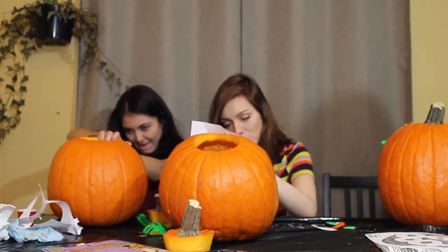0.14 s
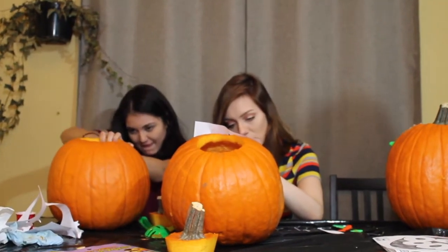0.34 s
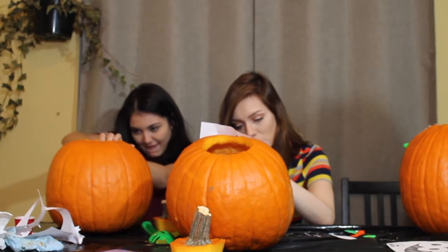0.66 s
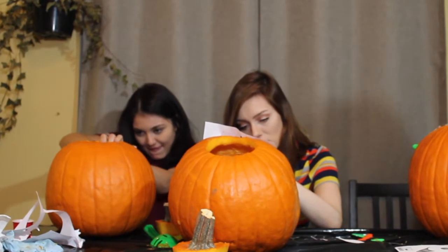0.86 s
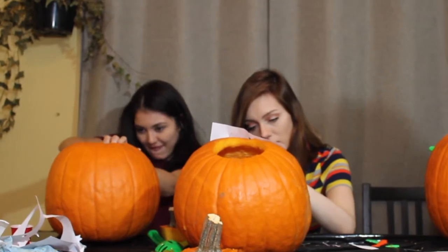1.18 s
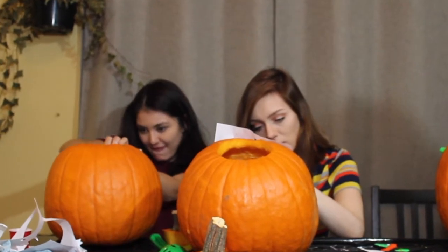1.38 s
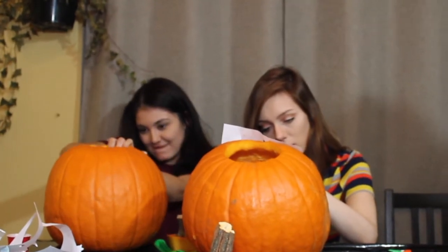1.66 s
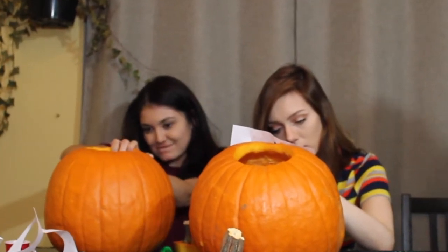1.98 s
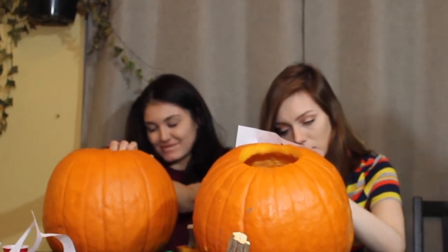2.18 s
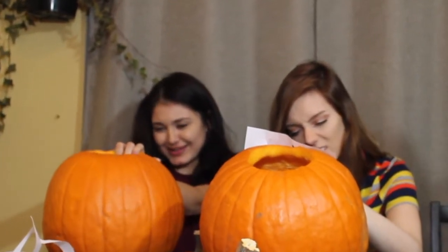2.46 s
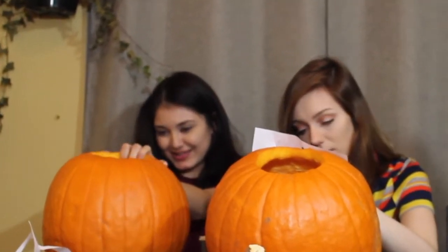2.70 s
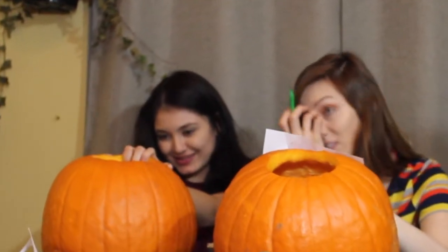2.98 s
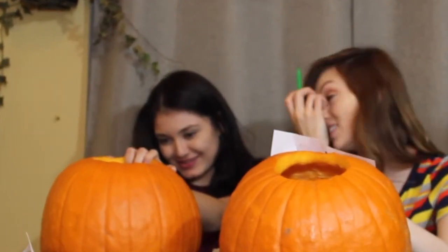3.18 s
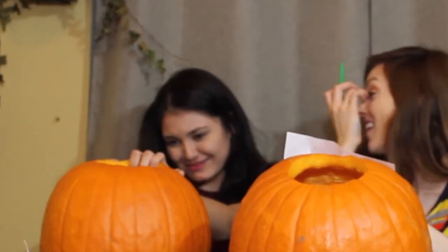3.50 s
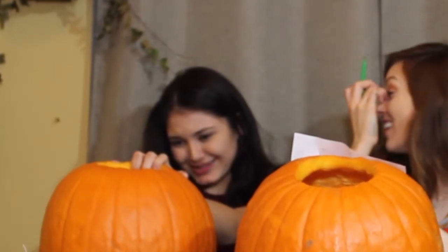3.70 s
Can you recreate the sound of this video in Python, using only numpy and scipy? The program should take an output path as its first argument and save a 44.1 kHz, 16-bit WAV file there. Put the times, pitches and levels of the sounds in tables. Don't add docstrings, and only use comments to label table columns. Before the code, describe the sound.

A small hand saw works through a thick, hollow pumpkin shell. A soft push is ending at 0 s, then a quiet pull follows. Louder, raspy pushes begin near 0.5, 1.4, 2.2 and 3.1 s, groaning hollowly with wet tearing snaps; softer, airier pulls start near 0.9, 1.8, 2.7 and 3.5 s. Brief scrapes mark turns, the table faintly thumps, in a small room with muffled treble and faint hiss.

```python
import sys
import numpy as np
from scipy import signal
from scipy.io import wavfile
from scipy.ndimage import uniform_filter1d

SR = 44100
rng = np.random.default_rng(int(sys.argv[2]) if len(sys.argv) > 2 else 0)


def voltage_ratio(level):
    return 10 ** (np.asarray(level, float) / 20)


def wav_out(sig):
    wavfile.write(sys.argv[1], SR, np.round(np.clip(np.atleast_2d(sig).T, -1, 1) * 32767).astype(np.int16))


N = 169785

# pitch_hz, level_db per Hz
HUSH_COLOUR = [(15, -37), (25, -14), (265, -9), (371, -10), (559, -3), (950, -11.5), (1430, -7.5),
               (2430, -19.5), (7920, -31), (10300, -69.5), (17400, -120)]
# pitch_hz, t60_s
ROOM_DECAY = [(150, .35), (600, .2), (2000, .2), (7000, .15)]
# centre_s, length_s,
# pitch_hz, level_db
LOW_SWELLS = [(.01, 0.045, 176, -44.5), (0.208, .06, 183, -48.5), (0.457, .05, 179, -53),
              (0.616, .07, 126, -56.5), (0.802, .08, 225, -40.5), (0.886, .09, 74, -56.5),
              (1.083, 0.058, 70, -58), (1.133, .1, 180.5, -50.5), (1.456, 0.076, 122, -51),
              (1.453, .06, 228, -39), (1.59, 0.094, 75.1, -65), (1.728, 0.082, 73.3, -55),
              (2.074, 0.058, 74.1, -54.5), (2.081, 0.094, 185, -50), (2.209, 0.16, 60, -61.5),
              (2.46, 0.076, 225, -41.5), (2.55, .1, 74, -52), (2.633, .07, 131.4, -61),
              (3.33, 0.055, 60, -52), (3.338, 0.072, 228, -40), (3.396, 0.074, 72, -56.5),
              (3.631, 0.11, 64.8, -52)]
# centre_s, length_s, pitch_hz, level_db
LOW_GRABS = [(0.582, .035, 530, -34.5), (0.631, .04, 546.7, -31.5), (0.67, .032, 554.3, -22),
             (0.735, .022, 556, -26), (0.777, 0.027, 550, -33), (0.813, .035, 552, -28.5),
             (0.84, .02, 546.4, -26.5), (1.44, .02, 525, -29.5), (1.485, .033, 555.2, -25.5),
             (1.533, .026, 554.3, -22), (1.577, .03, 552, -31.5), (1.619, .03, 544.5, -20.5),
             (1.656, .022, 520.4, -30), (1.7, .025, 500, -32), (2.254, .025, 550, -35),
             (2.28, 0.024, 551, -33.5), (2.315, .033, 550, -28), (2.345, .03, 554.6, -29.5),
             (2.384, .033, 550, -26), (2.421, .03, 549.5, -27), (2.473, 0.024, 550, -28),
             (2.501, .03, 551, -33), (2.528, .018, 544, -30.5), (2.553, 0.022, 549, -29.5),
             (2.581, .018, 537, -32.5), (2.604, 0.027, 539.4, -40), (3.13, .055, 540, -35),
             (3.187, .022, 555, -33), (3.209, .025, 555, -26.5), (3.259, .03, 550, -24.5),
             (3.289, .03, 549, -29.5), (3.356, .033, 540, -30.5), (2.122, .036, 517.3, -41.5),
             (3.592, 0.046, 529, -40), (3.792, .04, 545, -42)]
# centre_s, length_s, pitch_hz, level_db
HIGH_GRABS = [(0.212, 0.019, 1365, -38), (0.278, 0.026, 1370, -37), (0.412, 0.032, 1358, -37.5),
              (0.66, 0.019, 1400, -34.5), (0.705, 0.048, 1254, -29.5), (0.778, .045, 1030, -29.5),
              (0.809, 0.024, 1400, -34), (1.12, 0.029, 1256, -43), (1.213, 0.017, 1372, -35.5),
              (1.25, 0.028, 1366, -35), (1.504, .02, 1457, -35.5), (1.568, 0.024, 1452, -33),
              (1.6, 0.035, 840, -34), (1.611, 0.024, 1400, -31.5), (1.935, 0.025, 1390, -36),
              (1.975, 0.029, 1340, -37), (2.063, 0.023, 1429, -35), (2.364, 0.022, 1257, -34.5),
              (2.436, .03, 1030, -33.5), (2.46, .025, 1240, -38), (2.502, .025, 830, -34.5),
              (2.522, .03, 1455, -33.5), (2.816, 0.022, 1258, -35), (2.912, 0.044, 1365, -37.5),
              (3.196, 0.028, 1470, -37.5), (3.236, 0.038, 1227, -32), (3.294, 0.028, 1030, -28.5),
              (3.548, 0.022, 1377, -42), (3.605, 0.024, 1370, -36), (3.627, .025, 950, -35),
              (3.652, 0.034, 1400, -34), (3.659, 0.027, 1030, -35), (3.709, .04, 1030, -39),
              (3.742, 0.031, 1366, -37)]
# start_s, length_s, level_db
BLADE_CATCHES = [(0.044, .009, -48.5), (0.088, 0.013, -55.5), (0.546, 0.014, -55.5), (0.568, 0.017, -48),
                 (0.905, 0.014, -44.5), (0.966, 0.021, -47), (1.409, 0.0071, -46.5), (1.435, 0.01, -47),
                 (1.8, 0.013, -50.5), (1.822, .02, -47.5), (2.231, .012, -50), (2.685, 0.0096, -48.5),
                 (3.065, 0.016, -51), (3.103, .015, -41), (3.475, 0.022, -53.5), (3.492, 0.045, -48.5)]
# pitch_hz, level_db
CATCH_COLOUR = [(100, -14.5), (500, -0.5), (1500, 0), (4000, -6), (8000, -9)]
# start_s, level_db
LOUD_TEETH = [(.737, -21.5), (.751, -22.5), (.85, -27), (.974, -35), (1.006, -31.5), (1.031, -32),
              (1.541, -22), (1.597, -23.5), (2.281, -32), (2.33, -25.5), (2.422, -25), (2.461, -20.5),
              (2.523, -24.5), (2.776, -29.5), (3.191, -29), (3.24, -26), (3.296, -22), (3.345, -22.5),
              (3.56, -28.5), (3.63, -27.5)]
# start_s, length_s, top_speed_place 0-1, tearing_db, extra_ring_db
PUSHES = [
    (-.33, 0.4, 0.65, -36, 6.5),
    (.515, 0.39, 0.56, -29.5, 3),
    (1.365, 0.4, 0.54, -29, 5),
    (2.21, 0.44, 0.5, -29.5, 4),
    (3.06, 0.38, 0.53, -28, 5),
]
# start_s, length_s, top_speed_place 0-1, tearing_db, extra_ring_db
PULLS = [
    (.075, .44, 0.43, -37, 0.016),
    (.945, 0.42, 0.46, -35.5, 0),
    (1.785, 0.42, 0.41, -34.5, 0.032),
    (2.665, 0.38, 0.5, -33.5, 0.0074),
    (3.462, 0.39, 0.49, -33.5, 0.0058),
]
# pitch_hz, level_db per Hz
PUSH_COLOUR = [(35, -60), (60, -45), (136, -28.5), (222, -18.5), (393, -8), (545, -10), (629, -10.5),
               (1230, -3.5), (7920, -28), (10300, -73), (17400, -120)]
PULL_COLOUR = [(35, -55.5), (60, -17), (139, -24), (177, -13), (289, -12), (545, -6), (1180, -4),
               (1500, -2.5), (7920, -25.5), (10300, -61.5), (17400, -120)]
# pitch_hz, power
PUSH_POWER = [(100, 0.4), (500, 0.68), (1200, 1.8), (3000, 3.08), (7000, 2.9)]
PULL_POWER = [(100, 0.29), (500, 0.25), (1200, 0.98), (3000, 1.68), (7000, 1.45)]
# pitch_hz, width_hz, push_db, pull_db
SHELL_MODES = [(172.7, 46, 12, 7), (228, 20, 9.5, 4), (464, 82, 0.5, 7), (557, 37, 5, 9), (840, 95, 7.5, 4),
               (1030, 32, 1, 8), (1237, 30, -2, 1.5), (1355, 70, 0.5, 4), (1464, 70, 3, -1),
               (2583, 47, 4.5, 2.5), (378, 100, -3.5, -1.5), (3658, 250, 4.5, 2.5), (4360, 73, 1, 4),
               (5430, 450, 4.5, 4.5)]
# pitch_hz, step_db
THINNING_STEP = [(300, -12), (1500, -3), (2500, 4), (4000, 8.5), (8000, 9.5)]

HUSH_DB = -57
ROOM_DB, EARLY_DB = -11, -19
GRAB_WOBBLE, ROCK_WOBBLE = 12., 4.
TICK_HZ, TICK_S = 1095, .0006
SNAPS_PER_S, SNAP_SPREAD_DB = 2500, 2.5
SMEAR = .66
BITE_DB, BITE_S = .9, .012
RING_HZ, RING_SPREAD_HZ = 462, 70
PATCH_DB = 1.5
LOW_CUT_HZ, TOP_HZ = 54, 8020
STEP_WANDER_DB = 2.2
QUIET_DB, QUIET_FINER_DB = -12, -5


def evened(x):
    return x / np.sqrt(np.mean(x ** 2) + 1e-20)


def read(points, hz):
    f, value = np.transpose(points)
    return np.interp(np.log(hz + 1), np.log(f + 1), value)


def patches(shape, tall, long):
    field = uniform_filter1d(rng.standard_normal(shape), tall, axis=0)
    return evened(uniform_filter1d(field, long, axis=1))


def colour(x, db_of_hz):
    hz = np.abs(np.fft.fftfreq(16384, 1 / SR))
    log_gain = np.log(voltage_ratio(db_of_hz(hz)))
    taps = np.fft.ifft(np.exp(np.conj(signal.hilbert(log_gain)))).real[:6000]
    return signal.oaconvolve(x, taps)[:len(x)]


def hush():
    noise = colour(rng.standard_normal(N), lambda hz: read(HUSH_COLOUR, hz))
    return voltage_ratio(HUSH_DB) * evened(noise)


def room(x):
    taps = np.zeros(SR // 2)
    at = np.arange(400, len(taps) - 20, 20)
    taps[at + rng.integers(0, 20, len(at))] = rng.choice([-1., 1.], len(at))
    hz, t, z = signal.stft(taps, SR, nperseg=256)
    decay = voltage_ratio(-60 * t / read(ROOM_DECAY, hz)[:, None])
    tail = signal.istft(z * decay, SR, nperseg=256)[1]
    tail = voltage_ratio(ROOM_DB) * tail / np.linalg.norm(tail)
    early = np.zeros(len(tail))
    early[rng.integers(40, 900, 7)] = voltage_ratio(EARLY_DB) * rng.uniform(-0.92, 1, 7)
    return x + signal.fftconvolve(x, tail + early)[:N]


def swell(centre, length, hz, db, wobble):
    near = slice(max(int((centre - 2 * length) * SR), 0), int((centre + 2 * length) * SR))
    t = (np.arange(N) / SR)[near]
    drift = wobble * np.cumsum(uniform_filter1d(rng.standard_normal(len(t)), size=150)) / np.sqrt(SR)
    envelope = np.exp(-np.abs(2 * (t - centre) / length) ** 2.6)
    out = np.zeros(N)
    out[near] = voltage_ratio(db) * envelope * np.sin(2 * np.pi * hz * t + drift)
    return out


def low_swells():
    return sum(swell(*row, wobble=ROCK_WOBBLE) for row in LOW_SWELLS)


def shell_grabs():
    return sum(swell(*row, wobble=GRAB_WOBBLE) for row in LOW_GRABS + HIGH_GRABS)


def snaps():
    size = voltage_ratio(SNAP_SPREAD_DB * np.minimum(rng.exponential(1, N), 5)) * rng.choice([-1., 1.], N)
    size *= rng.random(N) < SNAPS_PER_S / SR
    t = np.arange(N) / SR
    rates = np.geomspace(.15, 1.5, 24) / BITE_S
    bite = evened(sum(np.sin(2 * np.pi * (rate * t + rng.random())) for rate in rates))
    tearing = (1 - SMEAR) * evened(size) + SMEAR * rng.standard_normal(N)
    return tearing * voltage_ratio(BITE_DB * bite)


def blade_catches():
    t = np.arange(N) / SR
    envelope = sum(voltage_ratio(db) * (t >= s) * np.exp(-np.abs(t - s) / length) for s, length, db in BLADE_CATCHES)
    return envelope * evened(colour(snaps(), lambda hz: read(CATCH_COLOUR, hz)))


def loud_teeth():
    train, t = np.zeros(N), np.arange(300) / SR
    at, db = np.transpose(LOUD_TEETH)
    train[(at * SR).astype(int)] = voltage_ratio(db) * rng.choice([-1., 1.], len(at))
    tick = np.exp(-t / TICK_S) * np.sin(2 * np.pi * TICK_HZ * t + .5)
    tears = signal.oaconvolve(train, tick)[:N]
    return signal.sosfilt(signal.butter(2, TICK_HZ / 4, "high", fs=SR, output="sos"), tears)


def strokes(rows, fibre, power, mode_column, bite_s, release_s, held):
    hz, t, z = signal.stft(snaps(), SR, nperseg=256, noverlap=192)
    gain = np.zeros(z.shape)
    for start, length, top, level_db, ring_db in rows:
        u = np.clip((t - start) / length, 0, 1)
        arch = np.sin(np.pi * u ** (np.log(.5) / np.log(top))).clip(0)
        grip = np.clip(np.minimum(u * length / bite_s, (1 - u) * length / release_s), 0, 1)
        speed = (held + (1 - held) * arch) * grip
        ring_lift_db = ring_db * np.exp(-((hz - RING_HZ) / RING_SPREAD_HZ) ** 2)
        gain += voltage_ratio(level_db + ring_lift_db)[:, None] * speed ** read(power, hz)[:, None]
    z = z * gain * voltage_ratio(PATCH_DB * patches(z.shape, tall=3, long=20))
    tearing = signal.istft(z, SR, nperseg=256, noverlap=192)[1][:N]

    def tone_db(f):
        modes = sum(m[mode_column] / (1 + (2 * (f - m[0]) / m[1]) ** 2) for m in SHELL_MODES)
        return read(fibre, f) + modes

    band = np.linspace(0, SR / 2, 4000)
    return colour(tearing, tone_db) / np.sqrt(np.mean(voltage_ratio(tone_db(band)) ** 2))


def scene():
    push = strokes(PUSHES, PUSH_COLOUR, PUSH_POWER, mode_column=2, bite_s=.08, release_s=.06, held=.27)
    pull = strokes(PULLS, PULL_COLOUR, PULL_POWER, mode_column=3, bite_s=.047, release_s=.07, held=.3)
    sources = push + pull + blade_catches() + loud_teeth() + shell_grabs() + low_swells()
    return (room(sources) + hush())[None]


def thinned(x, size=2048):
    bins = np.arange(int(2 * size * TOP_HZ / SR)) + .5
    n = np.arange(2 * size) + .5
    window = np.sin(np.pi * n / (2 * size))
    basis = window * np.cos(np.pi / size * np.outer(bins, n + size / 2)) * np.sqrt(2 / size)
    blocks = np.pad(x, (size, 2 * size - N % size)).reshape(-1, size)
    c = basis @ np.hstack([blocks[:-1], blocks[1:]]).T
    level = np.sqrt(uniform_filter1d(c ** 2, size=61, axis=0) + 1e-16)
    step_db = read(THINNING_STEP, bins * SR / (2 * size))[:, None]
    step = level * voltage_ratio(step_db + STEP_WANDER_DB * patches(c.shape, tall=8, long=2))
    quiet = (c ** 2).mean(0) < voltage_ratio(QUIET_DB) ** 2 * (c ** 2).mean()
    step = step * voltage_ratio(QUIET_FINER_DB * quiet)
    back = (basis.T @ (np.round(c / step) * step)).T
    return (back[1:, :size] + back[:-1, size:]).ravel()[:N]


def roll_off(x):
    return signal.sosfilt(signal.butter(12, 8070, fs=SR, output="sos"), x)


def record(dry):
    low_cut = signal.butter(2, LOW_CUT_HZ, "high", fs=SR, output="sos")
    mix = thinned(signal.sosfilt(low_cut, dry[0]))[None]
    return roll_off(mix)


dry = scene()
out = record(dry)
wav_out(out)
```